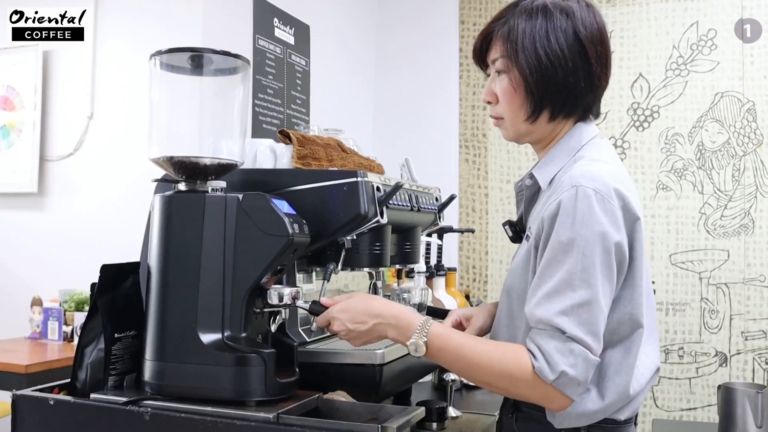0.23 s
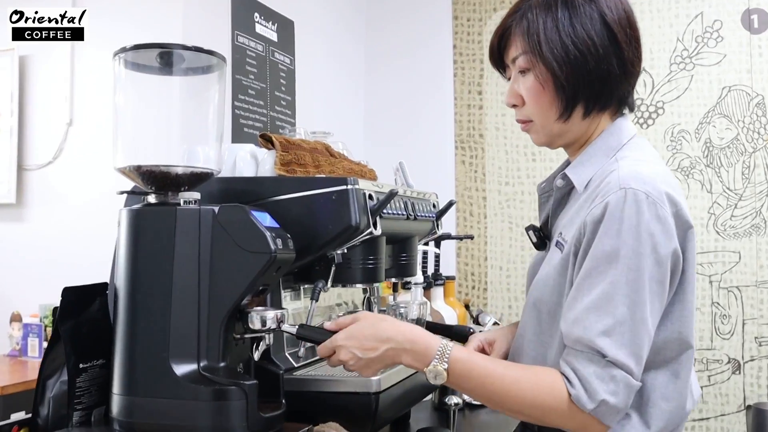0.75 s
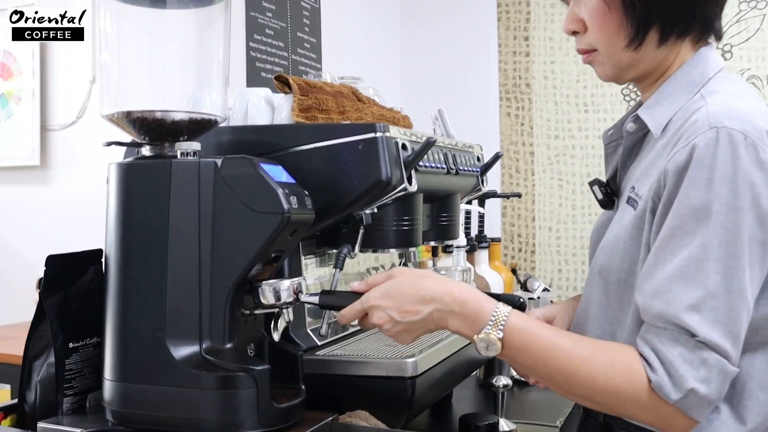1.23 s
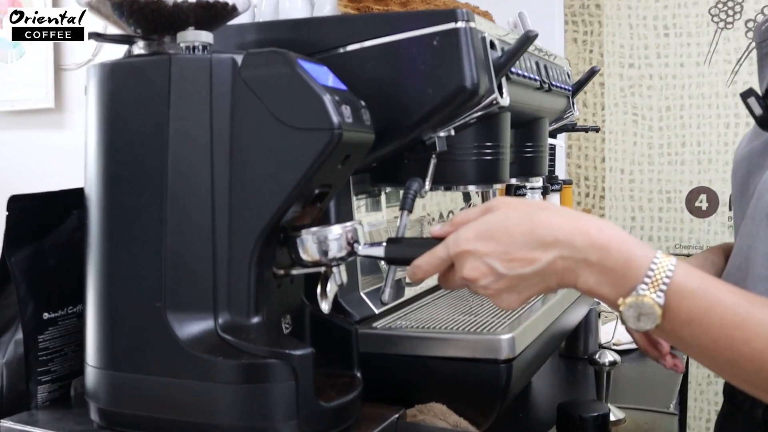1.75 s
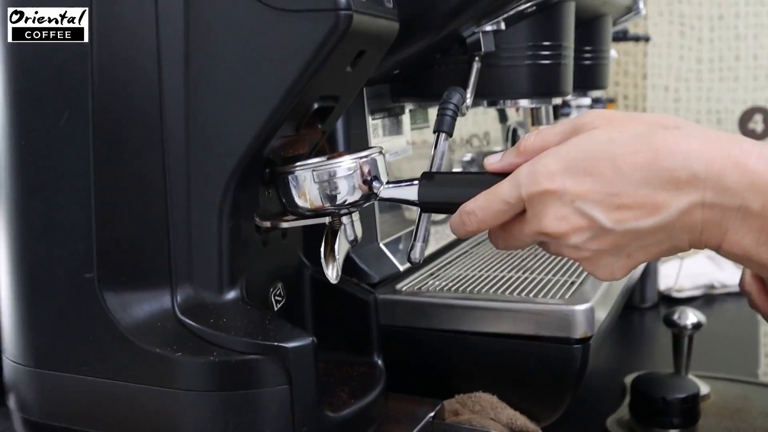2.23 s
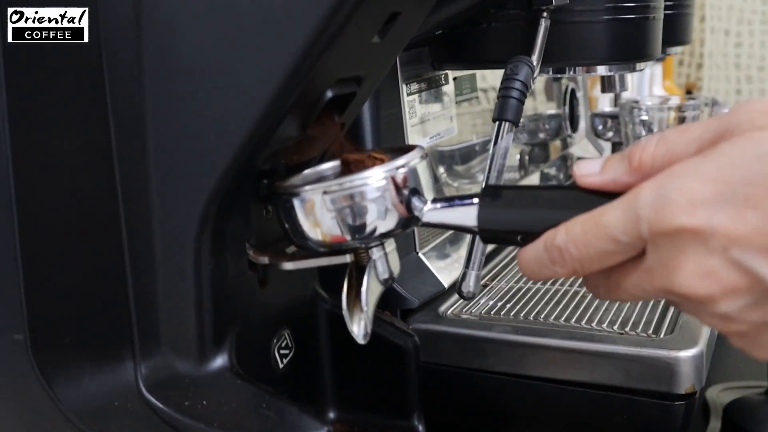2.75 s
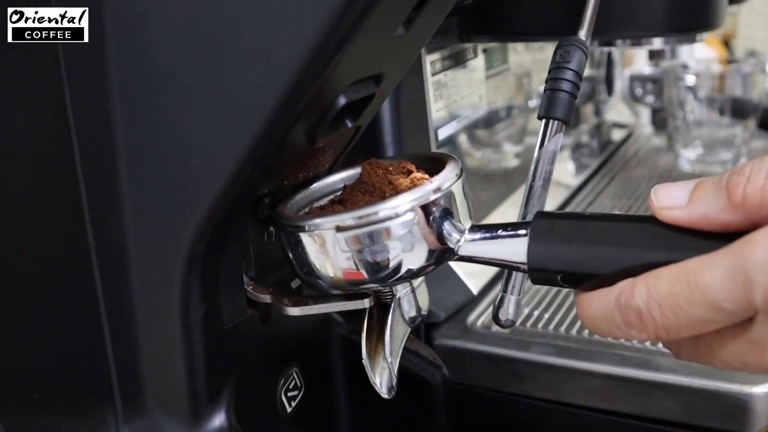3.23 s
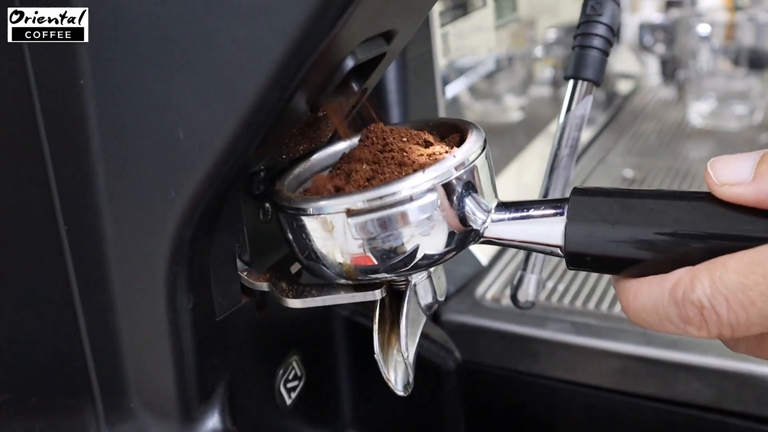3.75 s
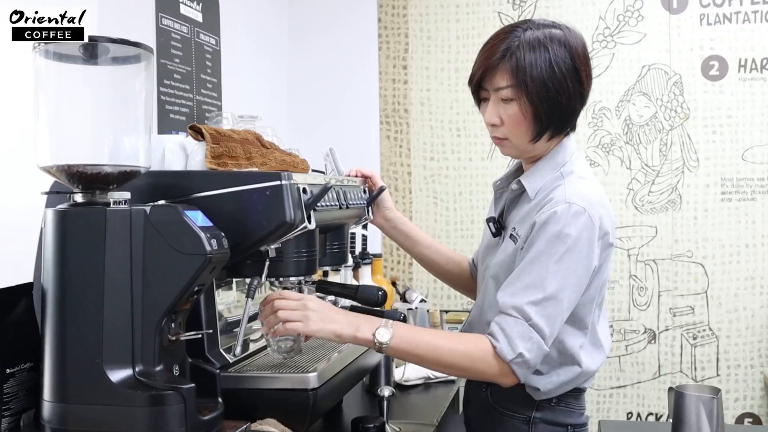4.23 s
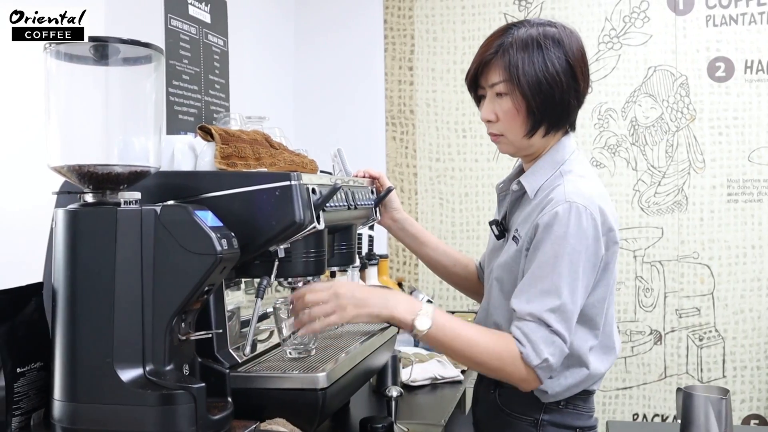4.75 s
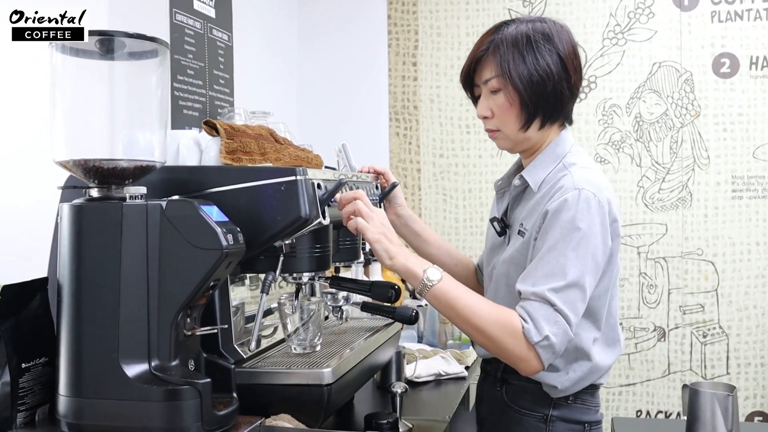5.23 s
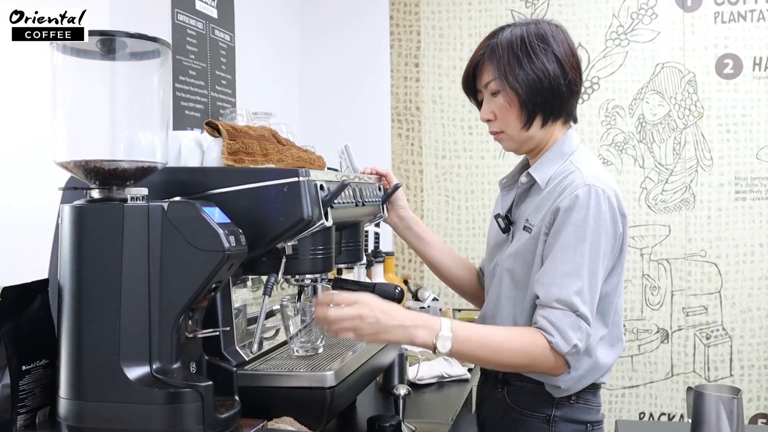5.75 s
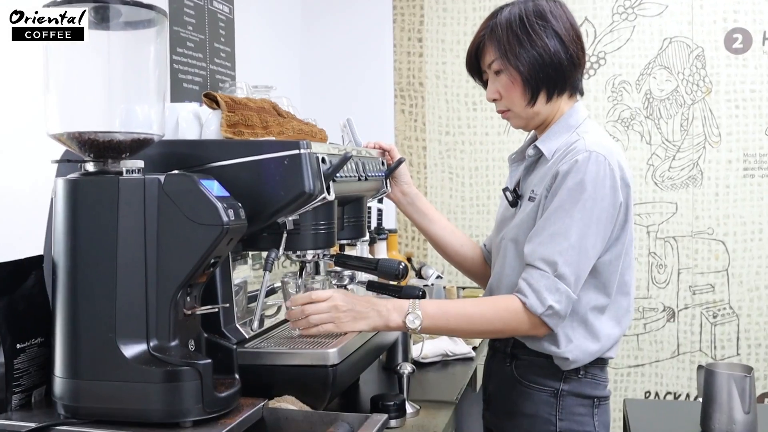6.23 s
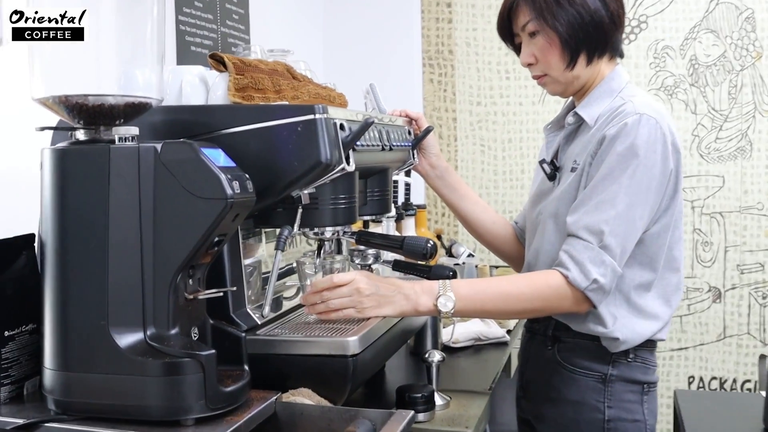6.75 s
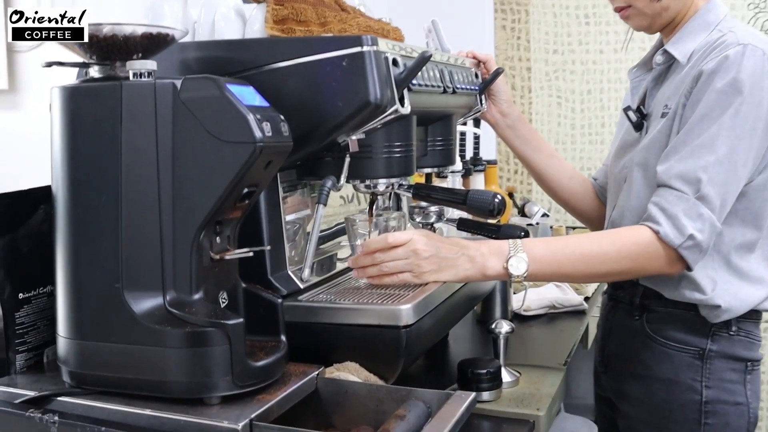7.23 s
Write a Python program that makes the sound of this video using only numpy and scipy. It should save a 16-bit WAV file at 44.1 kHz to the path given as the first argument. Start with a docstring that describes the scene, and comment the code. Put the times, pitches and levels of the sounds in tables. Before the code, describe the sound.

A small coffee shop, heard closely with short wall reflections; faint low rumble, machine murmur and hiss lie underneath. At about 0.24 s a grinder kicks in with a thump and a louder first crunch, then runs steadily: dense gritty bean crushing, a strong fluttering whine around 1.7 kHz and a faint motor drone. It sags slightly, loses power near 3.87 s and is gone by 4.1 s. From 4.39 to 4.65 s a glass lands on a steel tray with sharp clunks and short gritty scrapes, leaving faint ringing. A soft tick at 5.4 s precedes a hard valve snap at 5.5 s and a brief bright steam puff. The pump starts at 5.55 s, surging, then humming near 100 Hz with buzz, water roar and gentle throb. Water hiss swells around 6 s. From 6.46 to 7.35 s the glass knocks and scrapes on ringing grate bars as the pump continues.

```python
"""Small shop: rumble, machine murmur and hiss throughout. A burr grinder starts, crushes beans and runs down:
random cracks through resonances, plus wavering tones. A glass is set on the steel tray and slid into place:
dying noise bursts, ringing modes, gritty slips. A valve snaps and puffs steam (shaped grit). The pump starts,
humming at twice the mains over buzz and water roar, and the background hiss swells with water; the glass is
then shuffled on the grate bars."""
import sys
import numpy as np
from scipy import signal
from scipy.fft import rfft, irfft
from scipy.io import wavfile

SR = 44100
rng = np.random.default_rng(int(sys.argv[2]) if len(sys.argv) > 2 else 0)


def bounce(signal):
    """Save signal as a 16-bit WAV file at the path given by the first command-line argument."""
    frames = np.transpose(np.atleast_2d(signal))
    limited = np.clip(frames, -1, 1)
    pcm = np.round(limited * 32767).astype(np.int16)
    wavfile.write(sys.argv[1], SR, pcm)


N = 330750

# background rumble, murmur and hiss; the hiss swells with water once the pump runs:
# time_s, rumble_db, murmur_db, hiss_db
BACKGROUND_LEVELS = [(0, -46, -42, -53.5), (.107, -41, -44.5, -56), (.109, -42, -35, -45),
                     (1, -58, -50.5, -52), (4.1, -56, -45, -50.5), (4.12, -33, -32.5, -47.5),
                     (4.8, -44, -36.5, -50), (5.4, -36.5, -37.5, -49), (6, -35.5, -35.5, -41.5),
                     (7.5, -36, -44, -38)]
# relative spectrum of the traffic rumble: freq_hz, level_db
RUMBLE_SPECTRUM = [(12, -35), (20, -5), (59, 11.5), (75, 2), (103, 0.5), (120, -15.5), (160, -39),
                   (260, -120)]
# relative spectrum of the fridges and boilers: freq_hz, level_db
MURMUR_SPECTRUM = [(47, -58), (80, -4.5), (190, -7.5), (257, -9), (368, -15.5), (396, -11.5), (1050, -22),
                   (1180, -19.5), (2500, -54), (3250, -79), (5500, -120)]
# relative spectrum of the hiss: freq_hz, level_db
HISS_SPECTRUM = [(900, -3.5), (1500, 1), (3500, -9), (10000, -13), (13300, -14), (16500, -21)]

# short low-to-mid thumps and bite tones: start_s, level_db, pitch_hz
THUMPS = [(0.224, -17, 107), (.252, -12, 790), (.305, -15, 1340), (4.518, -23, 188), (4.654, -16, 141),
          (5.444, -22, 217), (5.69, -15.5, 204)]
# relative spectrum of bean fractures: freq_hz, level_db
CRUSH_SPECTRUM = [(150, -66), (250, -30.5), (360, -27), (452, -12), (1500, -13), (1730, -1.5), (1950, -16),
                  (2320, -20), (3340, -16), (3710, -20.5), (5350, -12), (9330, -19), (11100, -24),
                  (15000, -22), (16200, -24.5)]
# burrs and chute singing: pitch_hz, width_hz, level_db
BURR_MODES = [(1661, 82, -6), (1698.4, 38.5, 4.5), (1752, 64, -0.5), (1832, 46, -8.5)]
# close burr tones fluttering against each other: pitch_hz, level_db
BEATING_TONES = [(1693, -9), (1741, -3)]
# burr tooth overtones, relative to the crushing: pitch_hz, level_db
TOOTH_OVERTONES = [(3463, -11), (5200, -7.5)]
# grinder housing and hopper: pitch_hz, width_hz, level_db
HOUSING_MODES = [(447, 23.6, -0.5), (666.4, 11, 3), (833, 19, -1), (934, 25, -7), (1135, 61, -6.5),
                 (1316, 34, -21), (2106, 12, -6), (2550, 41, -12), (2780, 73, -30), (3290, 30, -3),
                 (5560, 44, -13), (6000, 56, -30), (5930, 35, -4), (6610, 68, -5.5), (7300, 155, -6),
                 (7970, 170, -5.5), (8490, 100, -8.5), (8920, 85, -6), (9350, 91, -8.5), (10600, 190, -16),
                 (12800, 230, -36), (15000, 500, -30)]
# low motor drone: pitch_hz, width_hz, level_db
MOTOR_MODES = [(65.4, 15, -4.5), (149.2, 18, 2), (206.5, 29, 0), (254.5, 12, -4), (317.7, 25, -1)]
# low hum: pitch_hz, width_hz, level_db
FLOOR_HUM_MODES = [(109, 9.6, 0)]
# course of the low hum: time_s, level_db
FLOOR_HUM_LEVELS = [(0, -37), (.1, -41), (.11, -33), (.3, -38), (.4, -42.5), (1.2, -45), (3, -61),
                    (4.1, -48.5)]

# glass set down on the tray; shares relative to the mid band: start_s, level_db, bass_share_db, treble_share_db
SET_DOWN_BLOWS = [(4.3913, 3, -13, 2.5), (4.4194, -18, 7, -7), (4.533, -9.5, -3, -4), (4.592, 0.5, -18, 0)]
# dry ticks of the switch gear: start_s, level_db, bass_share_db, treble_share_db
SWITCH_TICKS = [(5.377, -27, -12, -6), (5.754, -19, 6, -20)]
# valve snapping open: start_s, level_db, bass_share_db, treble_share_db
VALVE_SNAPS = [(5.5125, -4, -9, 5.7)]
# glass foot on the bars: start_s, level_db, bass_share_db, treble_share_db
SHUFFLE_BLOWS = [(6.464, -19.5, 8, -9), (6.5034, -15, 0, 1), (6.5314, -9.5, 11.5, -0.5),
                 (6.6234, -12.5, 3, -12), (6.7364, -25, 1, -11), (6.783, -15, -11, -11),
                 (6.824, -9.5, -19, -5), (6.9194, -14, -1, -11), (7.022, -16, -4, -5),
                 (7.0664, -18, -5, -6), (7.1794, -21.5, -1, -11), (7.2963, -20, -5, -1),
                 (7.335, -22, -1, -10)]
# drip tray resonances: pitch_hz, width_hz, level_db
TRAY_MODES = [(405, 160, -13), (606, 140, -11), (1150, 140, -7), (1470, 140, -0.5), (1820, 240, 2.5),
              (2480, 50, -10), (3100, 64, -2), (3760, 60, -14), (4570, 170, -19), (5020, 150, -4.5),
              (5800, 92, -7), (7020, 170, -4), (8450, 320, -3)]
# valve body resonances: pitch_hz, width_hz, level_db
VALVE_MODES = [(1930, 100, -4.5), (3730, 120, -7.5), (5900, 180, -8.5), (7560, 360, -4), (9300, 1000, -2.5),
               (10700, 800, 2), (13100, 820, -5)]
# grate bar resonances: pitch_hz, width_hz, level_db
GRATE_MODES = [(792, 8.3, 18), (1302, 11, 15), (1600, 100, 7), (1920, 90, 7), (2344, 32, 7), (2860, 27, -5),
               (3000, 22, 7), (3250, 37, 2), (3430, 29, 5.5), (3930, 64, -3), (4253, 31, 4), (4530, 27, 1),
               (4880, 40, 0), (5070, 49, -16), (5700, 33, -14), (5600, 22, -18), (6430, 21, -4),
               (7030, 70, 0), (8330, 87, -11), (8600, 140, -1.5), (8860, 77, -3), (9150, 32, -18),
               (9900, 50, -17)]

# glass pushed along the tray: start_s, length_s, body_db, treble_db
TRAY_STROKES = [(4.389, 0.016, -19, -16), (4.447, 0.054, -23.5, -25), (4.497, 0.073, -20.5, -27),
                (4.584, 0.022, -21, -20), (4.633, 0.031, -22.5, -26.5)]
# glass pushed along the grate: start_s, length_s, body_db, treble_db
GRATE_STROKES = [(6.503, 0.07, -27.5, -34.5), (6.58, 0.043, -26, -28.5), (6.64, 0.11, -30.5, -38.5),
                 (6.784, 0.094, -28, -27.5), (6.935, 0.04, -29, -32.5), (7.02, 0.0079, -28, -27.5),
                 (7.066, 0.014, -31, -36.5), (7.295, 0.038, -28, -30)]
# relative spectrum of the slide's body: freq_hz, level_db
SLIDE_BODY_SPECTRUM = [(71, -45), (120, -16), (190, -4.5), (295, -14.5), (337, -12), (430, -5.5),
                       (1090, -7.5), (1350, -8), (2400, -13), (6000, -26.5), (7800, -29), (13200, -120)]
# relative spectrum of the slide's treble: freq_hz, level_db
SLIDE_TREBLE_SPECTRUM = [(2060, -35), (3500, -5), (5090, 1), (6530, -6), (7900, 4.5), (9090, 0.5),
                         (13400, -9), (15300, -34), (16000, -46)]
# tray ringing on faintly: pitch_hz, level_db
TRAY_TONES = [(1147, 2.5), (1190, -6), (1265, -2), (2422, -14)]
# course of that ringing: time_s, level_db
TRAY_TONE_LEVELS = [(4.6, -38), (4.9, -43), (5.15, -49.5), (5.4, -53), (5.5, -59)]

# course of the steam puff: time_s, level_db
STEAM_LEVELS = [(5.513, -18), (5.545, -27), (5.585, -21.5), (5.65, -27), (5.8, -43.5), (6.0, -64)]
# relative spectrum of the steam: freq_hz, level_db
STEAM_SPECTRUM = [(880, -5), (1500, 0.5), (3280, -9), (4920, -9), (5880, -5), (6760, -3.5), (10500, -0.5),
                  (14500, -15), (16000, -33)]

# relative spectrum of the water roar: freq_hz, level_db
ROAR_SPECTRUM = [(71, -49), (120, -5.5), (152, -9.5), (297, -13.5), (347, -14.5), (481, -12), (722, -12.5),
                 (1230, -23), (1480, -19.5), (3440, -38.5), (5000, -69.5), (6500, -81), (11000, -120)]
# casing buzz, relative to the roar: mains_multiple, level_db
CASING_BUZZ = [(1, -19), (4, -5.5), (5, -13.5), (6, -7), (8, -10), (9, -11.5), (10, -9), (11, -14),
               (12, -10)]

GRINDER_ON_S, SPIN_UP_S, POWER_OFF_S, GRINDER_ENDS_S = 0.24, 0.015, 3.866, 4.11
FIRST_TOUCH_GAIN = 0.21   # share of full effort the moment the motor catches
CRUSH_DB, WHINE_DB, DRONE_DB = -20.5, -14.5, -41.5   # base levels, before effort
SAG_DB_PER_S = 0.78   # the dose runs through
BITE_DB, BITE_S, BITE_FADE_S = 5, 0.07, 0.065   # the first beans crush louder
EASE_S, EASE_DB = 0.088, 2.5   # the load eases just before the power drops
WHINE_EASE_S, WHINE_EASE_DB = 0.098, 2.5   # the whine gives way a little earlier
RUN_DOWN_DB_PER_S, COAST_DB, COAST_DB_PER_S = 196, -8.5, 99   # quick drop, then the burrs coast
HOUSING_LAG_S = 0.024   # the housing follows the run-down late
WHINE_SURGE_DB, WHINE_SURGE_HZ = 0.97, 25

TRAY_BLOW_T60_S, TRAY_BLOW_RING_DB = 0.1, 7.2   # t60 of the mid band
VALVE_BLOW_T60_S, VALVE_BLOW_RING_DB = 0.051, 12
TICK_BLOW_T60_S, TICK_BLOW_RING_DB = 0.04, -22
GRATE_BLOW_T60_S, GRATE_BLOW_RING_DB = 0.097, 2.8
CONTACT_T60_S = 0.049   # rough contact that drives the ring
THUMP_T60_S, THUMP_ATTACK_S = 0.16, 0.0041

STROKE_ATTACK_S = 0.0063
TRAY_FADES_DB_PER_S, GRATE_FADES_DB_PER_S = (90, 197), (50, 370)   # body, treble
CHATTER_DEPTH = 0.39   # modulation of treble and rattle by the pump's shaking

MAINS_HZ = 49.58
VANE_HZ = 477   # the rotor slips below the mains, so this lies between the multiples
PUMP_ON_S, PUMP_RISE_S = 5.55, 0.038
START_SURGE_DB, START_SURGE_S = 5.5, 0.16
HUM_DB, ROAR_DB, VANE_DB = -19.5, -26.5, -25   # base levels at full pressure
UNLOADED_HUM_DB, UNLOADED_ROAR_DB, UNLOADED_VANE_DB = -1, -3.5, -16   # offsets before pressure builds
PRESSURE_S = 0.72   # time constant of the build-up
THROB_HZ, THROB_DIP_S = 4.17, 5.93
THROB_HUM_DB, THROB_ROAR_DB, THROB_VANE_DB = 1, 0.8, 1   # each way

SHOP_T60_S, WALL_CUT_HZ = 0.46, 2400
CUTOFF_HZ = 15800


def from_db(db):
    """Decibels to gain."""
    return np.exp(np.asarray(db) * np.log(10) / 20)


def to_db(gain):
    """Gain to decibels."""
    return 20 * np.log10(gain + 1e-9)


def rms_one(x):
    """Scale to unit rms."""
    return x / np.sqrt(np.mean(x ** 2) + 1e-20)


def in_time(rows):
    """Columns of a curve table at every sample; -200 outside the table."""
    time_s, *columns = np.transpose(rows)
    t = np.arange(N) / SR
    return [np.interp(t, time_s, column, left=-200, right=-200) for column in columns]


def ramp(start_s, length_s):
    """0 before the start, 1 after the length, straight between."""
    return np.clip((np.arange(N) / SR - start_s) / length_s, 0, 1)


def drift(rate_hz):
    """Slow random wander of unit rms: lowpassed noise made at 1/40 of the sample rate."""
    r = np.exp(-80 * np.pi * rate_hz / SR)
    white = rng.standard_normal(N // 40 + 2002)
    slow = signal.lfilter([1], [1, -2 * r, r * r], white)[2000:]   # drop the settling
    return np.interp(np.arange(N) / 40, np.arange(len(slow)), rms_one(slow))


def coloured(x, spectrum):
    """Give a white signal a spectrum that falls away steeply beyond its ends; rms 1."""
    freq_hz, level_db = np.transpose(spectrum)
    log_hz = np.log(freq_hz)
    bins = np.log(np.maximum(np.fft.rfftfreq(N, 1 / SR), 1))
    beyond = np.maximum(log_hz[0] - bins, 0) + np.maximum(bins - log_hz[-1], 0)
    gain = from_db(np.interp(bins, log_hz, level_db) - 20 * beyond)
    return rms_one(irfft(rfft(x) * gain, N))


def grit(cracks_per_s, spread_db):
    """Dense random cracks of uneven size and sign; rms 1."""
    size_db = spread_db * np.minimum(rng.exponential(1, N), 5)
    cracks = from_db(size_db) * rng.choice([-1, 1], N)
    return rms_one(cracks * (rng.random(N) < cracks_per_s / SR))


def resonate(x, modes, start_s, end_s, passes=1):
    """Parallel two-pole resonances with alternating signs, sounding only from start to end."""
    out = np.zeros(N)
    part = slice(round(start_s * SR), round(end_s * SR))
    for k, (pitch_hz, width_hz, level_db) in enumerate(modes):
        r = np.exp(-np.pi * width_hz / SR)
        b = [(1 - r * r) / 2, 0, (r * r - 1) / 2]
        a = [1, -2 * r * np.cos(2 * np.pi * pitch_hz / SR), r * r]
        y = x[part] + 1e-18
        for _ in range(passes):
            y = signal.lfilter(b, a, y)
        out[part] += (-1) ** k * from_db(level_db) * y
    return out


def wavering(pitch_hz, level_db, waver_db, swing_rad, rate_hz):
    """A sine whose level and phase wander."""
    gain = from_db(level_db + waver_db * drift(rate_hz))
    cycles = pitch_hz * np.arange(N) / SR + rng.random()
    return gain * np.sin(2 * np.pi * cycles + swing_rad * drift(rate_hz))


def background():
    """Lumpy traffic rumble, murmur of fridges and boilers, and hiss that swells with water: shaped noises."""
    rumble_db, murmur_db, hiss_db = in_time(BACKGROUND_LEVELS)
    white = rng.standard_normal((3, N))
    rumble = from_db(rumble_db + 0.67 * drift(10)) * coloured(white[0], RUMBLE_SPECTRUM)
    murmur = from_db(murmur_db + 2.3 * drift(2.1)) * coloured(white[1], MURMUR_SPECTRUM)
    hiss = from_db(hiss_db) * coloured(white[2], HISS_SPECTRUM)
    return rumble + murmur + hiss


def shop_echo(x):
    """Wall reflections: eight feedback delays, duller on every round, stepped block by block."""
    out = np.zeros(N)
    dull = np.exp(-2 * np.pi * WALL_CUT_HZ / SR)
    lags = (rng.uniform(0.014, 0.04, 8) * SR).astype(int)
    for k, lag in enumerate(lags):
        loop, state = x.copy(), [0.]
        gain = from_db(-60 * lag / SR / SHOP_T60_S)
        for i in range(lag, N, lag):
            back, state = signal.lfilter([gain * (1 - dull)], [1, -dull], loop[i - lag:i], zi=state)
            loop[i:i + lag] += back[:N - i]
        out += (loop - x) * (-1) ** k
    return out


def steam():
    """Bright, slightly sputtering hiss from the valve: dense shaped grit."""
    level_db = in_time(STEAM_LEVELS)[0] - 2.7 + 0.92 * drift(50)
    return from_db(level_db) * coloured(grit(15000, 1.5), STEAM_SPECTRUM)


def strokes_db(rows, fades_db_per_s):
    """Body and treble level of a run of strokes: quick attack, hold, steady fade; the loudest leads."""
    t = np.arange(N) / SR
    levels_db = []
    for k, fade_db_per_s in enumerate(fades_db_per_s):
        runs = []
        for start_s, length_s, *stroke_db in rows:
            attack_db = to_db(ramp(start_s, STROKE_ATTACK_S))
            fade_db = fade_db_per_s * np.maximum(t - start_s - length_s, 0)
            runs.append(stroke_db[k] + attack_db - fade_db)
        levels_db.append(np.max(runs, axis=0))
    return levels_db


def slides():
    """The glass foot stutters over steel: small slips excite the tray first, the grate bars later."""
    tones = sum(wavering(pitch_hz, level_db, 4, 2.0, 23) for pitch_hz, level_db in TRAY_TONES)
    out = from_db(in_time(TRAY_TONE_LEVELS)[0]) * tones
    pump_cycle = np.sin(4 * np.pi * MAINS_HZ * np.arange(N) / SR)   # twice the mains
    shake = 1 + CHATTER_DEPTH * ramp(PUMP_ON_S, PUMP_RISE_S) * pump_cycle
    slips = grit(5000, 2.2) * from_db(0.96 * drift(22))
    body = coloured(slips, SLIDE_BODY_SPECTRUM)
    treble = shake * coloured(grit(9000, 2.9), SLIDE_TREBLE_SPECTRUM)
    rattle = shake * grit(2500, 2.4)
    surfaces = ((TRAY_STROKES, TRAY_FADES_DB_PER_S, TRAY_MODES, 3, 8),
                (GRATE_STROKES, GRATE_FADES_DB_PER_S, GRATE_MODES, 2.5, 10))
    for rows, fades_db_per_s, modes, rub_db, ring_db in surfaces:
        body_db, treble_db = strokes_db(rows, fades_db_per_s)
        out += from_db(body_db + rub_db) * body + from_db(treble_db) * treble
        drive = from_db((body_db + treble_db) / 2) * rattle
        out += from_db(ring_db) * resonate(drive, modes, rows[0][0], rows[-1][0] + 0.5)
    return out


def thumps():
    """Short low-to-mid thumps and bite tones: decaying sines with a rounded onset."""
    out = np.zeros(N)
    t = np.arange(SR // 2) / SR
    for start_s, level_db, pitch_hz in THUMPS:
        at = round(start_s * SR)
        envelope = from_db(level_db - 60 * t / THUMP_T60_S) * (1 - np.exp(-t / THUMP_ATTACK_S))
        out[at:at + len(t)] += envelope * np.sin(2 * np.pi * pitch_hz * t)
    return out


def knocks():
    """Each blow is dying noise in three bands; a short rough contact rings the struck body's modes."""
    bands = []
    for edges_hz in ([250, 1200], [1200, 4000], [4000, 16000]):
        sos = signal.butter(2, edges_hz, "band", fs=SR, output="sos")
        bands.append(rms_one(signal.sosfilt(sos, rng.standard_normal(N))))
    out, white = np.zeros(N), rng.standard_normal(N)
    t = np.arange(SR // 2) / SR
    bodies = ((SET_DOWN_BLOWS, TRAY_MODES, TRAY_BLOW_T60_S, TRAY_BLOW_RING_DB),
              (VALVE_SNAPS, VALVE_MODES, VALVE_BLOW_T60_S, VALVE_BLOW_RING_DB),
              (SWITCH_TICKS, VALVE_MODES, TICK_BLOW_T60_S, TICK_BLOW_RING_DB),
              (SHUFFLE_BLOWS, GRATE_MODES, GRATE_BLOW_T60_S, GRATE_BLOW_RING_DB))
    for blows, modes, t60_s, ring_db in bodies:
        contact = np.zeros(N)
        for start_s, level_db, bass_share_db, treble_share_db in blows:
            at = round(start_s * SR)
            n = min(len(t), N - at)
            shares_db = (bass_share_db, 0, treble_share_db)
            for band, share_db, longer in zip(bands, shares_db, (1.4, 1, 0.8)):   # lows last longer
                decay_db = -60 * t[:n] / (t60_s * longer)
                out[at:at + n] += band[at:at + n] * from_db(level_db + share_db - 14 + decay_db)
            contact_db = level_db + ring_db - 60 * t[:n] / CONTACT_T60_S
            contact[at:at + n] += white[at:at + n] * from_db(contact_db)
        out += resonate(contact, modes, blows[0][0], blows[-1][0] + 0.5)
    return out


def pump():
    """The motor hums at twice the mains, the casing buzzes on other multiples; water roars inside."""
    t = np.arange(N) / SR
    slack = np.exp(-np.maximum(t - PUMP_ON_S, 0) / PRESSURE_S)   # 1 unloaded, 0 at full pressure
    throb = -np.cos(2 * np.pi * THROB_HZ * (t - THROB_DIP_S))
    on_db = to_db(ramp(PUMP_ON_S, PUMP_RISE_S) ** 2)
    hum_db = on_db + HUM_DB + UNLOADED_HUM_DB * slack + THROB_HUM_DB * throb
    roar_db = on_db + ROAR_DB + UNLOADED_ROAR_DB * slack + THROB_ROAR_DB * throb
    vane_db = on_db + VANE_DB + UNLOADED_VANE_DB * slack + THROB_VANE_DB * throb
    surge_in = ramp(PUMP_ON_S + PUMP_RISE_S, 0.071)
    surge_out = 1 - ramp(PUMP_ON_S + START_SURGE_S, 0.055)
    surge_db = START_SURGE_DB * surge_in * surge_out
    hum = np.sqrt(2) * np.sin(4 * np.pi * MAINS_HZ * t)
    vane = wavering(VANE_HZ, -1.0, 2.3, 1.7, 12)
    buzz = sum(wavering(k * MAINS_HZ, level_db, 4.5, 0.36, 7.3) for k, level_db in CASING_BUZZ)
    roar = coloured(rng.standard_normal(N), ROAR_SPECTRUM) * from_db(-0.5 + drift(45))
    return from_db(hum_db + surge_db) * hum + from_db(vane_db) * vane + from_db(roar_db) * (buzz + roar)


def running_db(lag_s=0):
    """Grinder effort: spin-up, slow sag, easing, run-down and coasting."""
    t = np.arange(N) / SR
    off_s = np.maximum(t - POWER_OFF_S - lag_s, 0)
    stop_db = np.maximum(-RUN_DOWN_DB_PER_S * off_s, COAST_DB - COAST_DB_PER_S * off_s)
    spin_up = np.maximum(FIRST_TOUCH_GAIN, ramp(GRINDER_ON_S + 0.01, SPIN_UP_S))
    running = (t > GRINDER_ON_S) * (t < GRINDER_ENDS_S)
    ease_db = EASE_DB * ramp(POWER_OFF_S - EASE_S, EASE_S)
    return to_db(spin_up * running) - SAG_DB_PER_S * t - ease_db + stop_db


def floor_hum():
    """Narrow resonant noise: a low hum that fades during the grinding and swells again near its end."""
    hum = resonate(rng.standard_normal(N), FLOOR_HUM_MODES, 0, GRINDER_ENDS_S, passes=2)
    return from_db(in_time(FLOOR_HUM_LEVELS)[0]) * rms_one(hum)


def burr_whine():
    """Burr teeth sing: cracks through narrow resonances, plus close wavering tones that beat."""
    sing = rms_one(resonate(grit(9000, 1.6), BURR_MODES, 0, GRINDER_ENDS_S, passes=2))
    beats = sum(wavering(pitch_hz, level_db, 2.8, 1.26, 15) for pitch_hz, level_db in BEATING_TONES)
    ease_db = WHINE_EASE_DB * ramp(POWER_OFF_S - WHINE_EASE_S, WHINE_EASE_S)
    level_db = WHINE_DB + WHINE_SURGE_DB * drift(WHINE_SURGE_HZ) - ease_db
    return from_db(level_db) * (from_db(-8) * sing + beats)


def grinder():
    """Thousands of bean fractures a second shake the housing; burr teeth and motor add whine and drone."""
    run_db = running_db()
    late_db = running_db(HOUSING_LAG_S) - run_db
    bite_db = BITE_DB * (1 - ramp(GRINDER_ON_S + BITE_S, BITE_FADE_S))
    feed = from_db(0.81 * drift(27))   # the feed of beans is uneven
    fractures = coloured(grit(12000, 2.47), CRUSH_SPECTRUM)
    housing = rms_one(resonate(grit(12000, 1.7), HOUSING_MODES, 0, GRINDER_ENDS_S))
    crush = from_db(3.5) * fractures + from_db(late_db - 4) * housing
    # speed jitters under load: phase swing grows with pitch
    tones = sum(wavering(pitch_hz, level_db, 2.7, pitch_hz / 3200, 14.5)
                for pitch_hz, level_db in TOOTH_OVERTONES)
    motor = rms_one(resonate(rng.standard_normal(N), MOTOR_MODES, 0, GRINDER_ENDS_S, passes=2))
    drone = from_db(DRONE_DB + bite_db) * motor
    crushing = from_db(CRUSH_DB + bite_db) * (feed * crush + tones)
    return from_db(run_db) * (crushing + burr_whine() + drone) + floor_hum()


def scene():
    """All sources; blows, thumps and grinder also come back from the walls."""
    blows, grind = knocks() + thumps(), grinder()
    echo = shop_echo(from_db(-15.5) * blows + from_db(-17) * grind)
    return (background() + echo + steam() + slides() + blows + pump() + grind)[None]


def record(dry):
    """The highest peaks are clipped, then the top is cut by a steep lowpass."""
    lowpass = signal.ellip(14, 0.5, 100, CUTOFF_HZ, fs=SR, output="sos")
    return signal.sosfilt(lowpass, np.clip(dry, -0.94, 0.94))


dry = scene()
out = record(dry)
bounce(out)
```